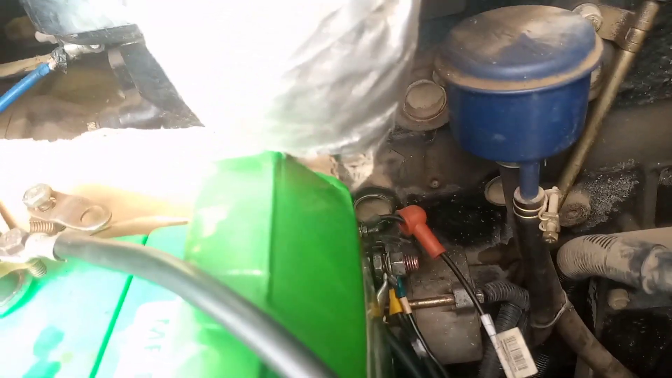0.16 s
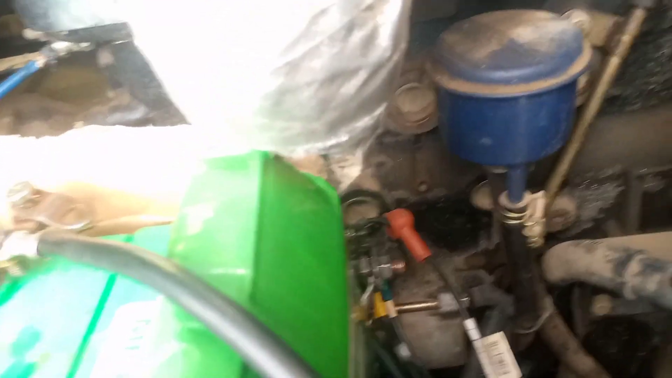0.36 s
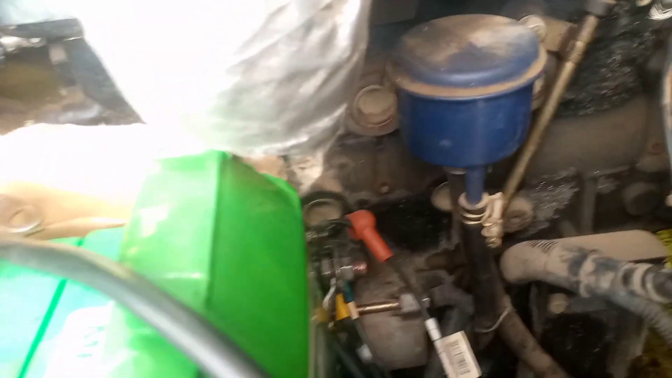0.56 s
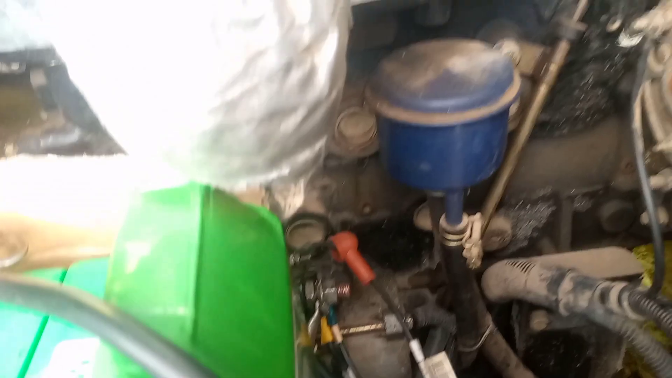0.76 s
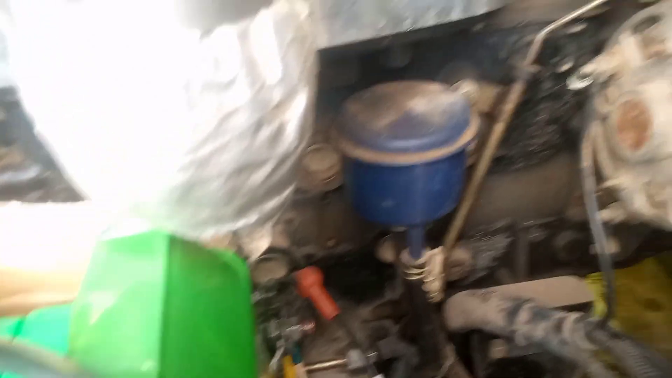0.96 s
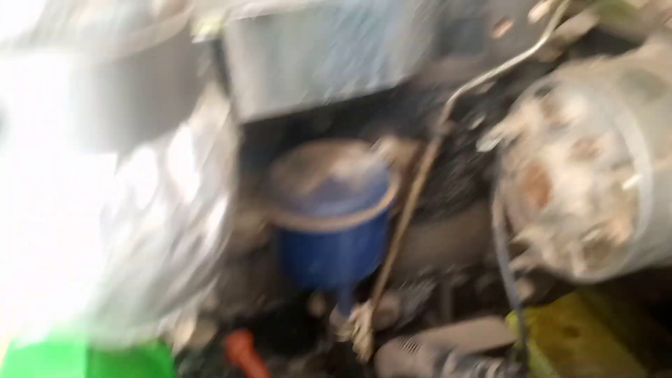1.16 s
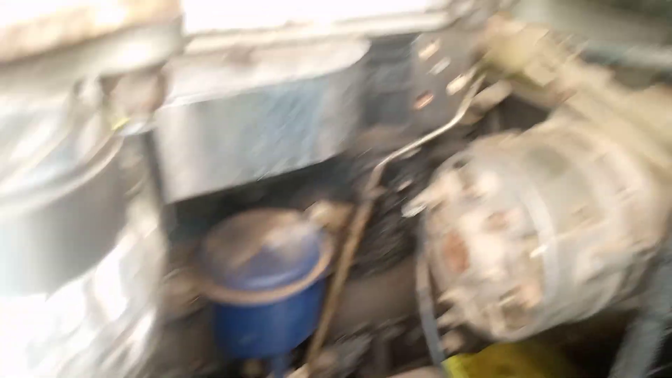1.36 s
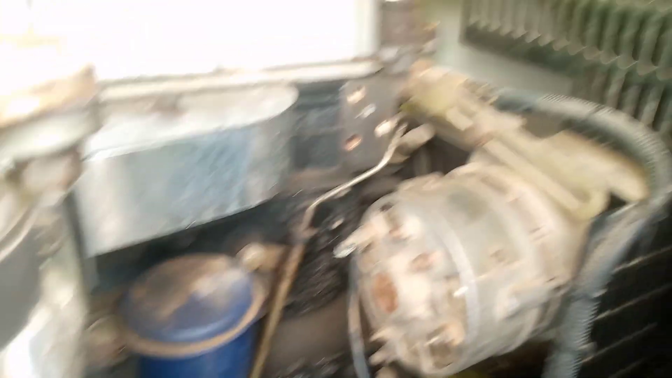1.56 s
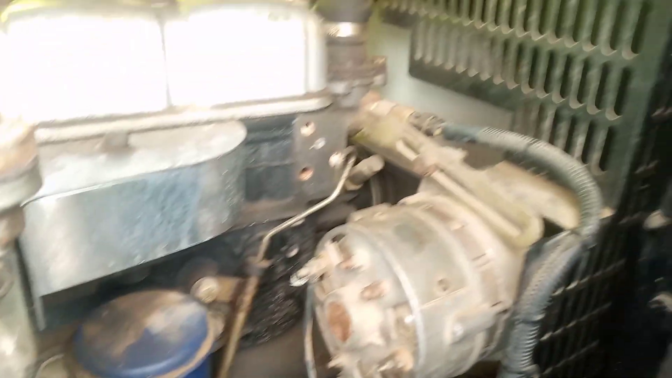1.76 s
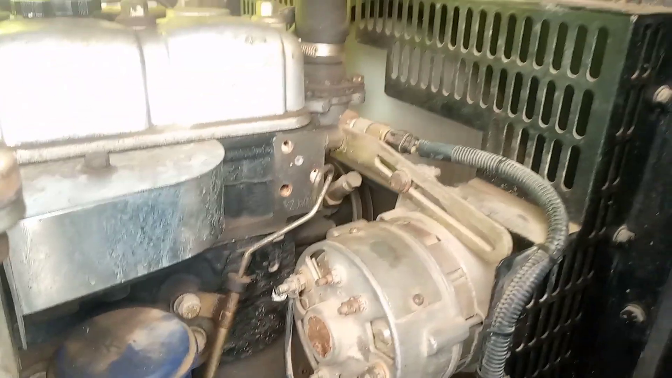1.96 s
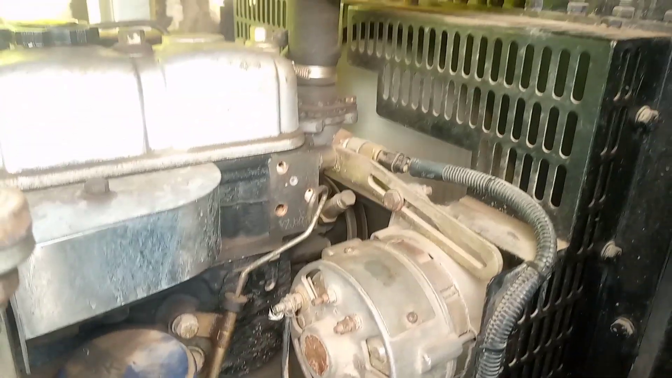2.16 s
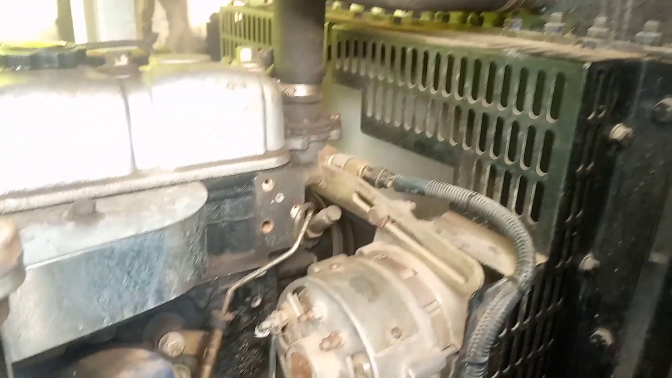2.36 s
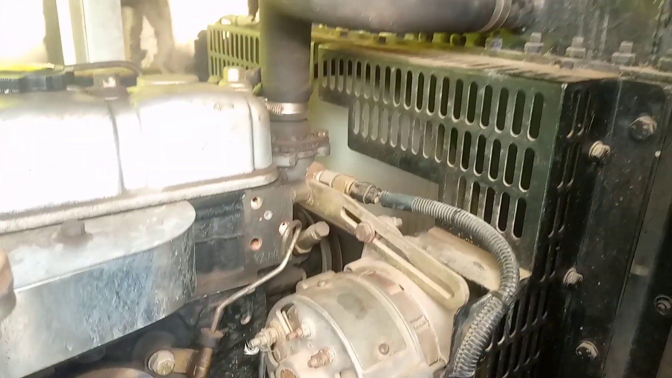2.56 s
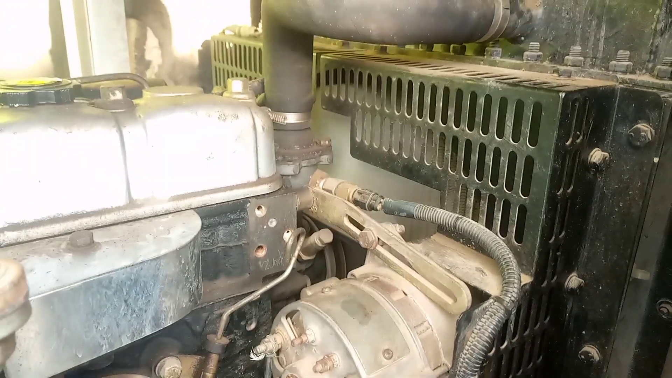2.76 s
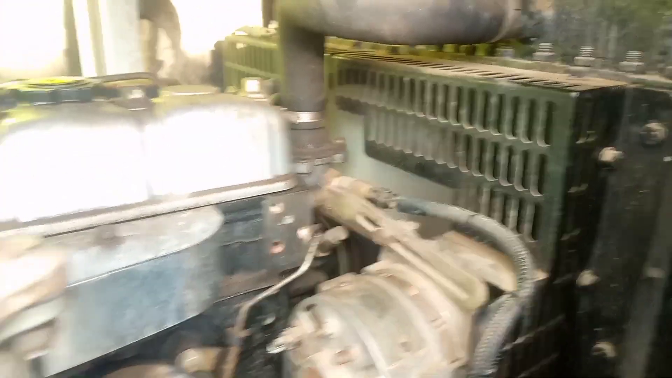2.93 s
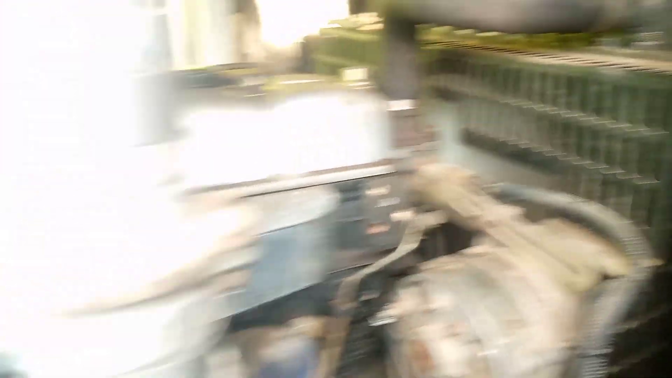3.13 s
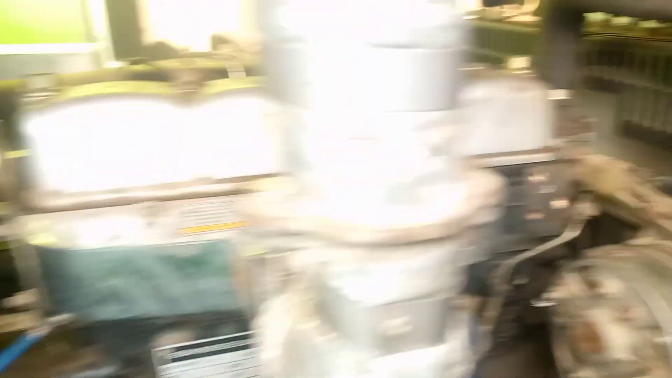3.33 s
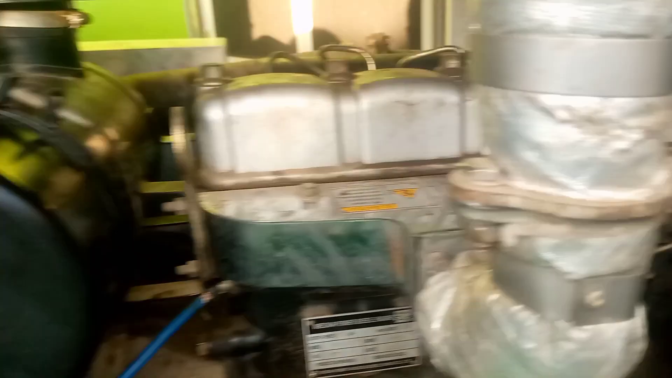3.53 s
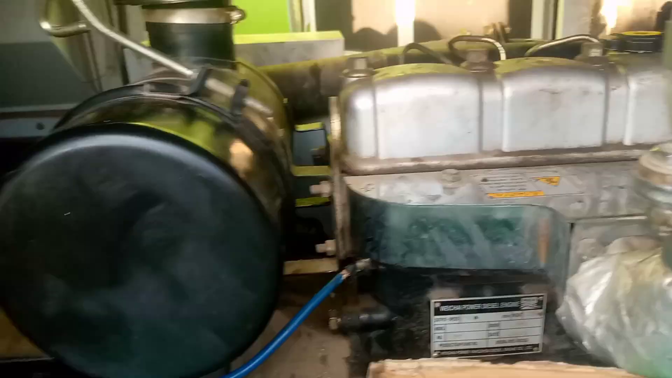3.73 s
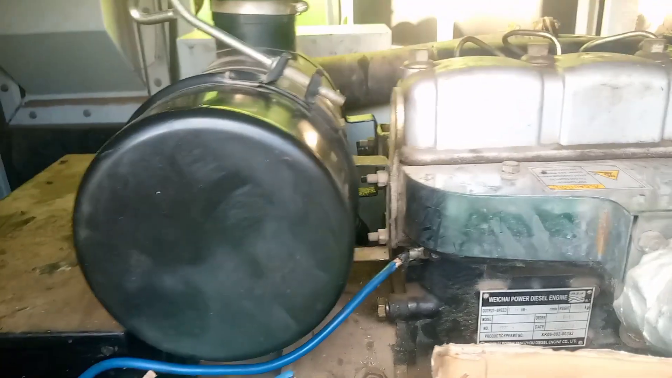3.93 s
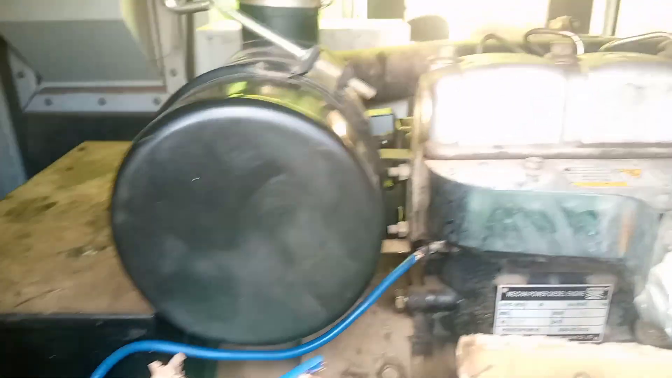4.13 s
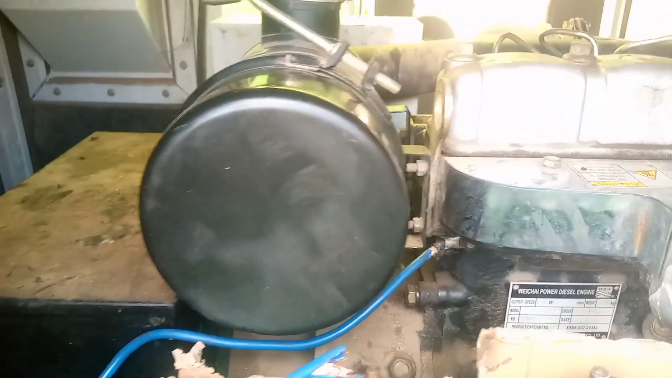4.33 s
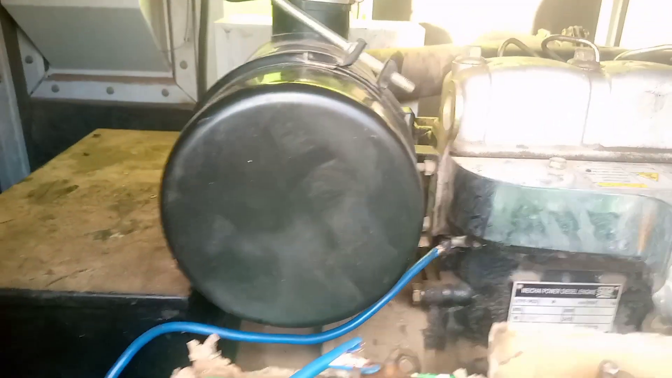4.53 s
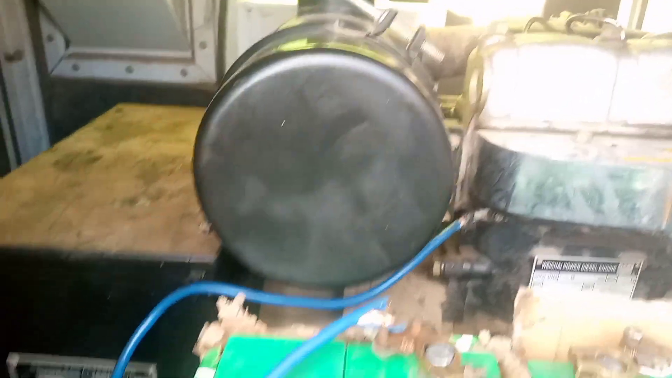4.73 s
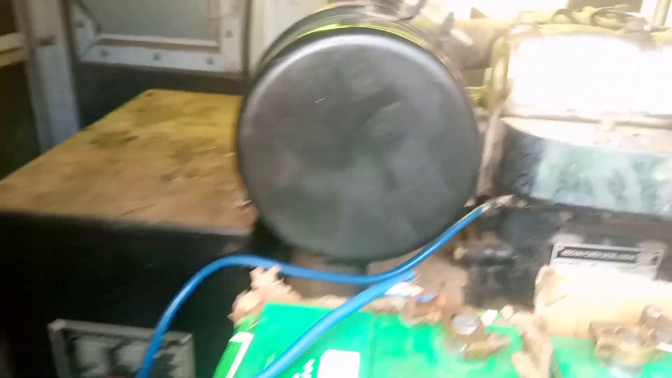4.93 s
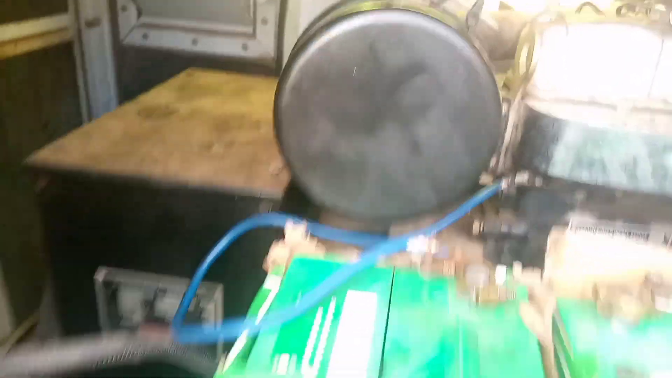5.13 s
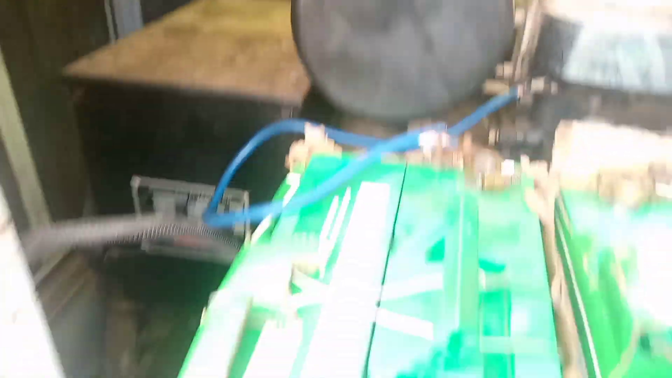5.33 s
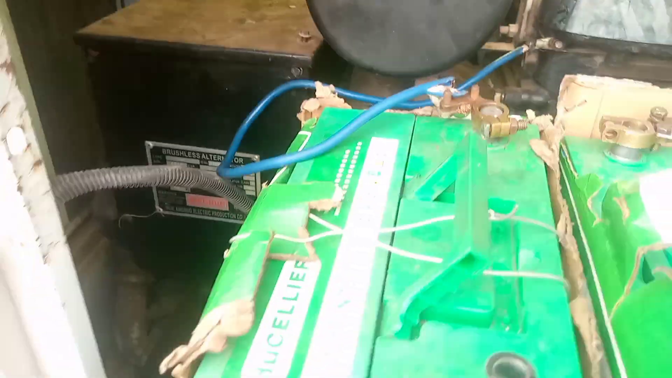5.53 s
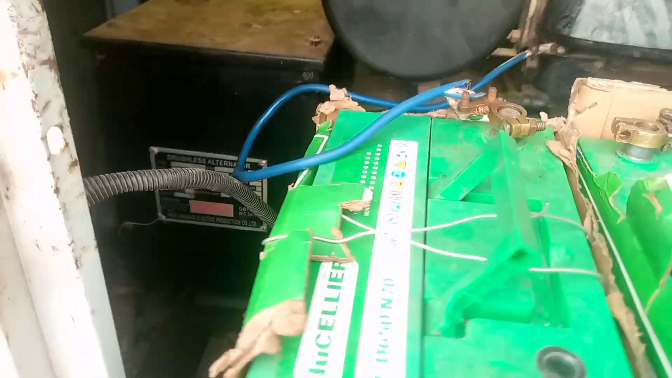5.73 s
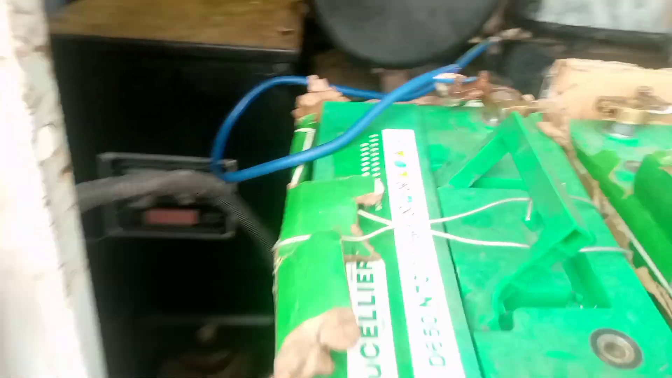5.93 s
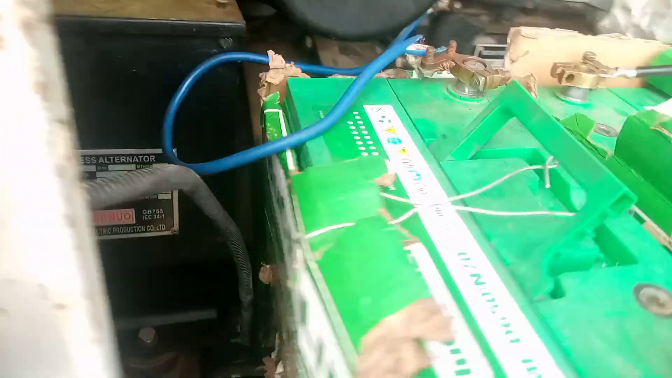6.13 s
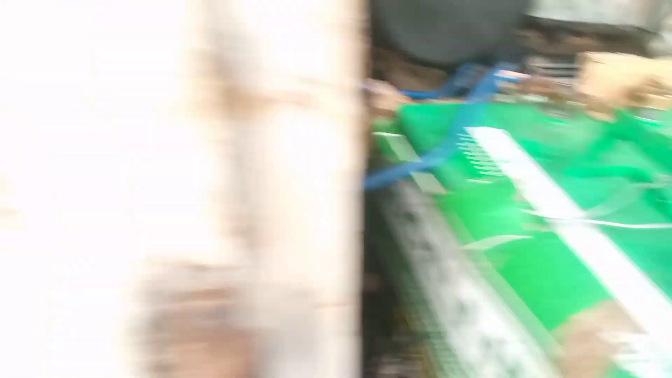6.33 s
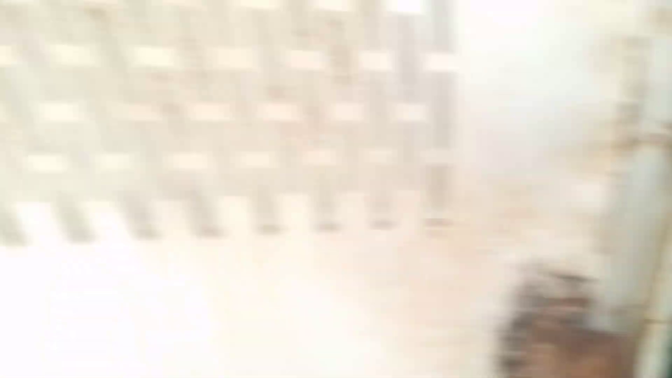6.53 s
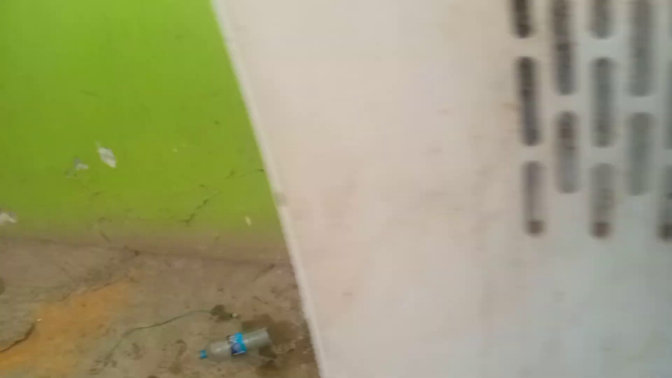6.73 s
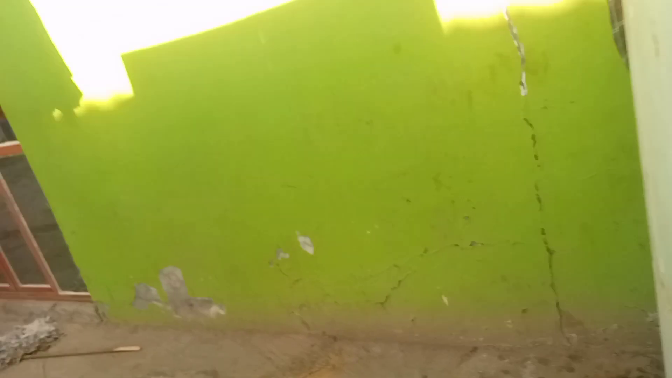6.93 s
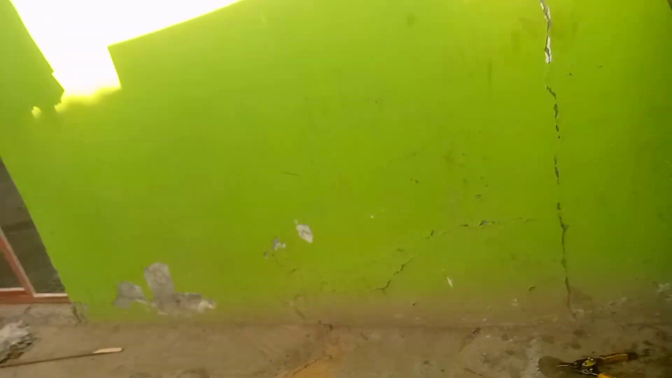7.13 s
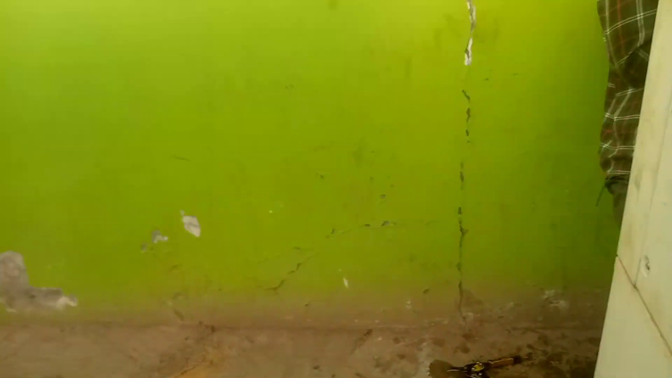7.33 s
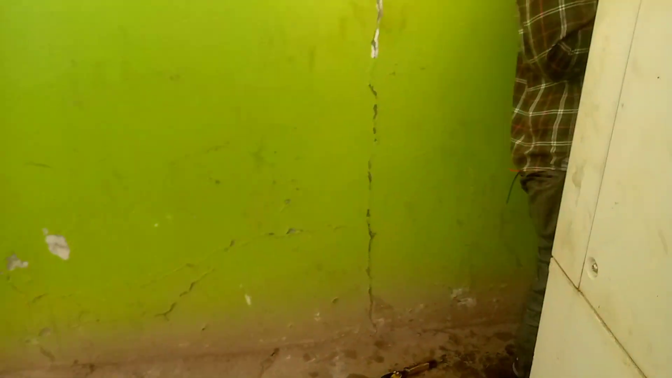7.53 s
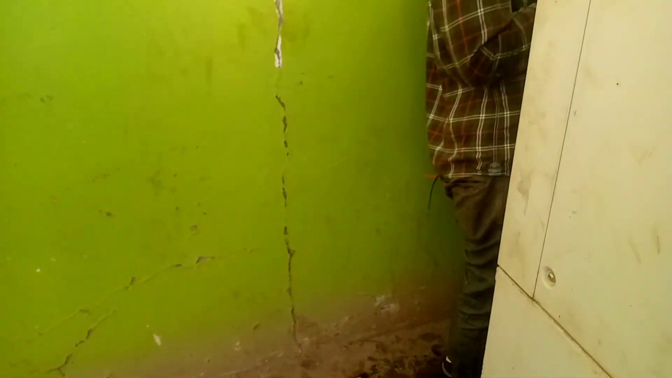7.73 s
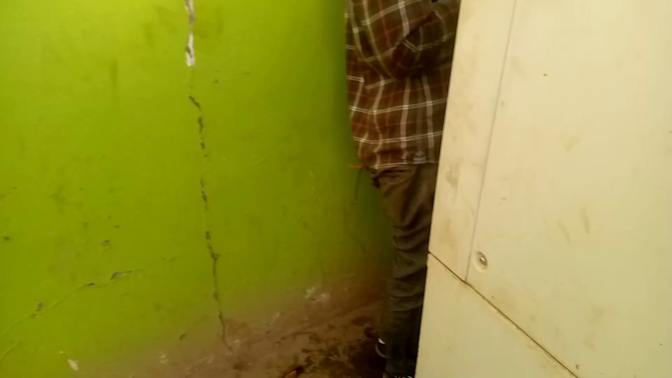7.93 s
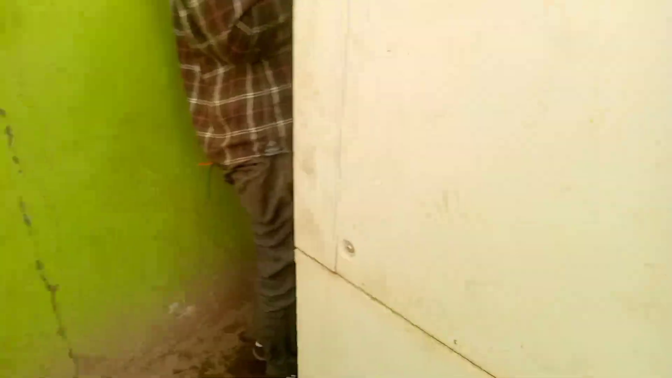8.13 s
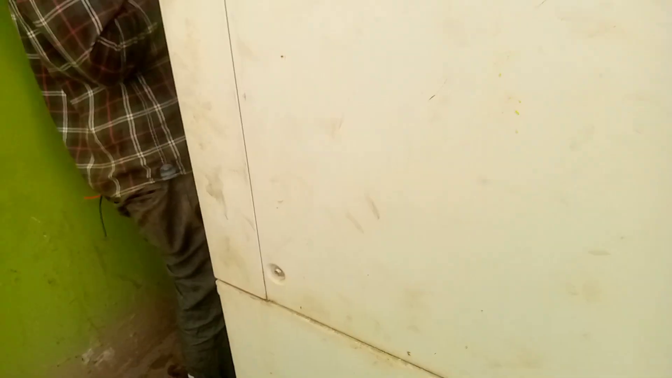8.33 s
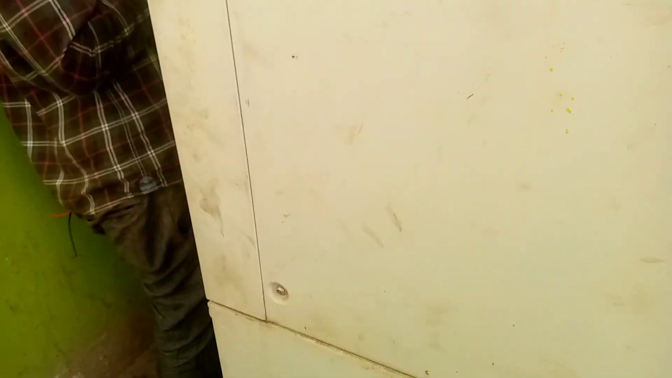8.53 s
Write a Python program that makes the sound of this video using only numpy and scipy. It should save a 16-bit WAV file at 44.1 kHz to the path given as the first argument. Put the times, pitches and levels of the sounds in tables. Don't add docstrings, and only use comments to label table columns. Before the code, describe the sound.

Close beside an open metal canopy, a four-cylinder diesel generator runs at constant speed, its rapid metallic knocking over a deep exhaust hum. A hard click on the camera shell near the start briefly ducks the sound; a softer one follows later. The clatter shifts colour as the camera pans, then fades behind the canopy, leaving mostly hum. Dull hand-held microphone, outdoors by a wall.

```python
import sys
import numpy as np
from scipy import signal
from scipy.fft import rfft, irfft, next_fast_len
from scipy.io import wavfile
from scipy.ndimage import map_coordinates

SR = 44100
rng = np.random.default_rng(int(sys.argv[2]) if len(sys.argv) > 2 else 0)


def master_out(mix):
    frames = np.transpose(np.atleast_2d(mix))
    ceiling = np.clip(frames, -1, 1)
    pcm = np.round(ceiling * 32767).astype(np.int16)
    wavfile.write(sys.argv[1], SR, pcm)


def volts_from_decibels(level):
    exponent = np.asarray(level, float) / 20
    return 10 ** exponent


N = 378378

CYCLE_HZ = 81.8 / 8
DETOUR_S = 0.0046

# (time [s], along the engine [m], height [m], shade of the canopy [0-1])
CAMERA_WALK = [(0.0, 0.52, -0.36, 0.04), (0.8, 0.47, -0.24, 0.07), (1.2, 0.8, 0.33, 0.05),
               (2.2, 0.93, 0.4, 0.07), (3.1, 0.73, 0.78, 0.06), (3.5, 0.11, 0.69, 0.09),
               (3.9, -0.53, 0.57, 0.04), (4.4, -0.49, 0.64, 0.02), (4.75, -0.46, 0.45, 0.0),
               (5.2, -0.63, 0.016, 0.0), (5.6, 0.063, -0.078, 0.17), (6.0, -0.11, 0.053, 0.13),
               (6.4, 0.19, 0.18, 0.27), (6.6, 0.13, -0.039, 0.37), (7.15, -0.21, 0.24, 1.0),
               (7.45, -0.29, -0.22, 1.1), (7.9, 0.35, 0.22, 1.18), (8.58, 0.36, 0.45, 1.07)]
# (time [s], lead [ms])
CLATTER_LEAD = [(0, 3), (1.4, 3.2), (2, 1.7), (3, 2), (4.2, 1.2), (6.2, 1), (7, 1), (7.4, 0), (8.58, 0)]


def unit(x):
    return x / np.sqrt(np.mean(x ** 2) + 1e-20)


def along(points, hz):
    f, v = np.transpose(points)
    return np.interp(np.log(hz + 1), np.log(f + 1), v)


def curves(rows):
    s, *cols = np.transpose(rows)
    return [np.interp(np.arange(N) / SR, s, c) for c in cols]


def wobble(rate):
    coarse = np.arange(0, N + 64, 64)
    knots = rng.standard_normal(int(N * rate / SR) + 4)
    return np.interp(np.arange(N), coarse, map_coordinates(knots, [coarse * rate / SR]))


def filtered(x, response):
    m = next_fast_len(N + SR // 2)
    return irfft(rfft(x, m) * response(np.fft.rfftfreq(m, 1 / SR)), m)[..., :N]


def modes(table):
    def response(f):
        total = 0
        for k, (centre, width, db) in enumerate(table):
            total = total + (-1) ** k * volts_from_decibels(db) * 1j * f * width / (centre ** 2 - f * f + 1j * f * width)
        return total
    return response


def ring(x, table, top=1.54):
    low, high = 0.7 * table[0][0], top * table[-1][0]
    return unit(filtered(x, lambda f: modes(table)(f) * f * f / (f * f + low ** 2) / (1 + 1j * f / high) ** 2))


def heard(*parts):
    # (along [m], height [m], depth behind the camera's path [m],
    # level at 1 m [dB], loss in full shade [dB])
    places = dict(order1=(0, 0.95, 1.5, -32.5, 0.5), order2=(0.55, 0.2, 2.5, -16.5, 7.5),
              order3=(0.5, -0.6, 2.5, -22, 8.5), rumble=(0.56, 0.14, 1.79, -27, 7.5),
              sump=(0.7, -.35, 1.56, -26, 13), block=(0.6, 0.27, 1.84, -25.5, 14),
              head=(0.69, 1.14, 1.01, -25, 16.5), injector=(0.23, -0.02, 0.37, -36.5, 23),
              plate=(.87, 0, 0.4, -33, 15.7), cover=(0.73, 0.5, 0.62, -31.5, 19),
              panels=(-0.54, .04, 0.93, -38, 6.5), pan=(0.84, -0.2, 0.07, -42.5, 4),
              door=(-0.02, .31, 0.14, -43, 10.5), filter=(-.7, 0.6, 0.35, -43.5, 15),
              pump=(-0.3, 0.4, 0.22, -46.5, 17.5), pipes=(.5, -0.1, .12, -50.5, 18.5),
              gears=(0.88, 0.7, 0.3, -39.5, 18.5), wall=(-.48, 0.3, 0.34, -50.5, -1.6))
    x, y, shade = curves(CAMERA_WALK)
    levels = []
    for part in parts:
        px, py, depth, db, loss_db = places[part]
        spreading = 10 * np.log10((x - px) ** 2 + (y - py) ** 2 + depth ** 2 + 1e-3)
        shadow = loss_db * np.abs(shade) ** (17 / max(loss_db, 4))
        levels.append(db - spreading - shadow)
    return levels


def crank():
    # (time [s], lead [ms])
    hunting = [(0.0, -0.33), (0.3, -0.25), (1.0, 0.89), (1.4, 1.71), (1.8, 1.62), (2.2, 0.15), (2.6, 0.22),
               (3.8, 1.3), (4.6, 2.57), (5.0, 2.73), (5.6, 2.45), (6.2, 3.04), (7.0, 3.02), (7.8, 1.63),
               (8.2, 1.67), (8.58, 1.34)]
    return CYCLE_HZ * (np.arange(N) / SR + curves(hunting)[0] / 1000)


def firings(turns):
    facing_per_m, balance_m = 4.2, 0.22
    cycles = int(turns[-1]) + 3
    _, height, shade = curves(CAMERA_WALK)
    detour = DETOUR_S * shade - curves(CLATTER_LEAD)[0] / 1000
    fill_db = 0.47 + 3.5 * shade
    firing = np.arange(-4, 4 * cycles - 4) / 4 + 0.112
    start = np.interp(firing, turns - detour * CYCLE_HZ, np.arange(N))
    start += SR * np.minimum(firing - turns[0], 0) / CYCLE_HZ
    start = np.round(start + SR * 0.00015 * rng.standard_normal(len(firing))).astype(int)
    above = height[np.clip(start, 0, N - 1)].reshape(cycles, 4) - balance_m
    burn = rng.standard_normal((cycles, 4)) + facing_per_m * above * np.array([0, -1, 0, 1])
    return start, burn, fill_db


def blows(fire, part, rise, t60, strike, strike_db, second_db, steady_db, repeat):
    by_cylinder = dict(sump=[1.2, 4.5, -3.5, 0.3], pan=[-14.5, 1.5, -8.5, 0], block=[0, 1, 0, -1],
                   plate=[-1.5, -1.2, 0.66, 1.2], cover=[-3, 0.5, -5.5, 0], head=[1, 0, -1, 1],
                   injector=[2.5, 1.7, 0, 1.5])
    start, burn, fill_db = fire
    t = np.arange(SR // 30) / SR
    repeat = np.clip(repeat, 0, 0.95)
    grit = rng.standard_normal((len(burn) + 9, 4, len(t)))
    grit = signal.lfilter([np.sqrt(1 - repeat ** 2)], [1, -repeat], grit, axis=0)[9:]
    first = volts_from_decibels(-60 * t / t60) * (1 - np.exp(-t / rise)) ** 2
    late = np.maximum(t - 0.011, 0)
    second = volts_from_decibels(second_db - 60 * late / t60) * (1 - np.exp(-late / 0.00019))
    grit *= first + second
    grit[..., round(strike * SR)] += volts_from_decibels(strike_db)
    size = volts_from_decibels(np.array(by_cylinder[part]) + 0.7 * burn + 0.7 * rng.standard_normal(burn.shape))
    index = SR + start[:, None] + np.arange(len(t))
    train = np.bincount(index.ravel(), (size[..., None] * grit).ravel())[SR:SR + N]
    rattle = volts_from_decibels(steady_db + fill_db + 0.7 * wobble(14)) * rng.standard_normal(N)
    return (train + rattle) * volts_from_decibels(-0.4 * fill_db)


def fingers():
    # (time [s], peak [dB], gain dip [dB])
    clicks = [
        (0.867, 0, -13.5),
        (0.8707, -10.5, 4.5),
        (2.9745, -12, 0.5),
    ]
    # (time [s], peak [dB])
    creak_times = [(0.4765, -53), (0.7196, -57.5), (0.7786, -59), (0.8185, -58), (0.8659, -43),
                   (1.7388, -53.5), (2.5782, -50), (2.68, -52.5), (2.7187, -63), (2.9736, -44.5),
                   (3.239, -62), (3.5583, -56), (3.5987, -58), (3.7988, -58), (4.3789, -67), (4.4852, -62),
                   (4.778, -61), (4.998, -60), (5.659, -60), (6.0498, -63), (6.147, -55), (6.3425, -66.5)]
    # (centre [Hz], width [Hz], level [dB])
    shell = [(900, 1500, 0), (2460, 300, 5.5), (4960, 1400, -1), (9000, 3000, -15.5), (14500, 3000, -28)]
    taps, creaks, dip_db = np.zeros(N), np.zeros(N), np.zeros(N)
    t = np.arange(N) / SR
    for s, db, depth_db in clicks:
        taps[round(s * SR)] = volts_from_decibels(db + 10.5)
        recovery = np.exp(-np.maximum(t - s - 0.015, 0) / 0.033)
        onset = 1 + np.exp(-np.clip((t - s + 0.0083) / 0.0035, -50, 50))
        dip_db += depth_db * recovery / onset
    for s, db in creak_times:
        creaks[round((s + 0.001) * SR)] = volts_from_decibels(db + 39.5)
    return filtered(taps, modes(shell)) + filtered(creaks, modes([(11000, 7000, 0.016)])), dip_db


def oil_pan(fire):
    blow = blows(fire, "pan", rise=0.0014, t60=0.03, strike=0.00496, strike_db=24,
                 second_db=-13.5, steady_db=-13.0, repeat=0.63)
    return volts_from_decibels(heard("pan")[0]) * ring(blow, [(652.4, 28, 0)])


def cover(fire):
    # (time [s], frequency [Hz])
    cover_pitch = [(0, 1957), (1, 1969), (2.5, 1992), (3.4, 1960), (4.2, 2005), (4.9, 2004), (5.5, 1914),
                   (6.2, 1974), (8.6, 1980)]
    # (centre [Hz], width [Hz], level [dB])
    plate_modes = [(1599, 34, 1.5), (1652, 78, 3)]
    panel_modes = [(359, 55, -1.4), (409.4, 27, -0.45), (460.4, 46, -0.33)]
    plate_db, cover_db, panels_db = heard("plate", "cover", "panels")
    plate = blows(fire, "plate", rise=0.001, t60=0.041, strike=0.002633, strike_db=21.0,
                  second_db=-8.5, steady_db=-11.0, repeat=0.66)
    drive = blows(fire, "cover", rise=0.0014, t60=0.035, strike=0.003033, strike_db=23.5,
                  second_db=3.0, steady_db=-13.0, repeat=0.72)
    share = np.clip((curves(cover_pitch)[0] - 1950) / 65, 0, 1) * np.pi / 2
    low, high = ring(drive, [(1960, 54, 0)]), ring(drive, [(2005, 28, 0)])
    lid = np.cos(share) * low - np.sin(share) * high
    panels = ring(rng.standard_normal(N) + 0.089 * plate, panel_modes)
    out = volts_from_decibels(plate_db - 0.8) * ring(plate, plate_modes)
    return out + volts_from_decibels(cover_db + 1.36) * lid + volts_from_decibels(panels_db - 1.0) * panels


def fittings(sump, block, head, injector):
    # (centre [Hz], width [Hz], level [dB])
    door = [(697, 150, -6.5), (1510, 80, -7), (1607, 83, 2), (1718, 80, -2)]
    air_filter = [(640, 44, -1), (772, 60, -1.5), (1064, 36, -3), (1231, 60, 2)]
    pump = [(2480, 140, -4.5), (2864, 90, 0.5), (3144, 160, -0.5), (4520, 60, -9)]
    pipes = [(3310, 150, 0.5), (3654, 150, -1.5), (3780, 120, -0.5), (4284, 120, -3)]
    gears = [(1338, 78, 0), (1483, 90, 0)]
    wall = [(443, 83, -0.5), (558, 90, 1), (684, 110, 1.5)]
    door_db, filter_db, pump_db, pipes_db = heard("door", "filter", "pump", "pipes")
    gears_db, wall_db = heard("gears", "wall")
    out = volts_from_decibels(pipes_db) * ring(injector, pipes) + volts_from_decibels(gears_db) * ring(block, gears)
    out += volts_from_decibels(wall_db) * ring(head, wall) + volts_from_decibels(door_db) * ring(block, door)
    return out - volts_from_decibels(filter_db) * ring(sump, air_filter) - volts_from_decibels(pump_db) * ring(injector, pump)


def knock(fire):
    # (centre [Hz], width [Hz], level [dB])
    sump_modes = [(538.5, 95, -3.5), (673, 72, -3.5), (797, 118, -3.5), (973, 270, -5.5)]
    block_modes = [(1071, 170, -6), (1258, 110, -0.5), (1415, 136, 0), (1527, 104, 1), (1915, 660, -8)]
    head_modes = [(2179, 42, 1.5), (2342, 207, -3), (2598, 126, 0), (2778, 227, -3), (2950, 91, 0.5),
                  (3080, 97, -0.5), (3222, 274, -3.5), (3650, 374, -8)]
    injector_modes = [(3690, 130, -6.5), (4088, 51, 1.5), (4384, 120, -3.5), (4690, 170, -4.5),
                      (5042, 120, -3.5), (5485, 160, -6), (5860, 200, -5.5), (6550, 580, -9.5),
                      (9000, 3800, -22), (15400, 1300, -23)]
    sump_db, block_db, head_db, injector_db = heard("sump", "block", "head", "injector")
    sump = blows(fire, "sump", rise=0.0023, t60=0.055, strike=0.00553, strike_db=17.0,
                 second_db=-7.5, steady_db=-7.5, repeat=0.75)
    block = blows(fire, "block", rise=0.0015, t60=0.049, strike=0.00285, strike_db=17.5,
                  second_db=-19.0, steady_db=-14, repeat=0.79)
    head = blows(fire, "head", rise=0.0017, t60=0.053, strike=0.003, strike_db=0.5,
                 second_db=-27.0, steady_db=-16.0, repeat=0.83)
    injector = blows(fire, "injector", rise=0.0022, t60=0.044, strike=0.0048, strike_db=2.5,
                     second_db=-31.0, steady_db=-19, repeat=0.53)
    out = volts_from_decibels(sump_db - 2.0) * ring(sump, sump_modes) + volts_from_decibels(block_db + 2.0) * ring(block, block_modes)
    out += volts_from_decibels(head_db - 1.65) * ring(head, head_modes)
    out += volts_from_decibels(injector_db - 1.5) * ring(injector, injector_modes, top=2.0)
    return out + fittings(sump, block, head, injector)


def exhaust(turns):
    # (multiple of the cycle rate, level re rumble [dB], gain in
    # shade [dB], phase in the open [rad], phase in shade [rad])
    higher_orders = [(16.01, -6, -1, 2.5, 2.5), (19.89, -14, 5, -1, -1.6), (24.02, -13, 7, 1, -1.5)]
    # (multiple of the cycle rate, level re rumble [dB])
    uneven = [(6, -11.5), (7, -24), (9, -14), (10, -19), (11, -18.5), (13, -22.5), (15, -15.5), (17, -15.5),
              (18, -12.5), (23, -21.5), (25, -9.5), (27, -16.5), (28, -16)]
    # (frequency [Hz], level [dB])
    rumble_shape = [(20, -33.5), (35, -28), (60, -9), (100, 1), (170, -3.5), (260, -5.5), (320, -5.5),
                    (400, -45), (600, -66)]
    db1, db2, db3, rumble_db = heard("order1", "order2", "order3", "rumble")
    angle, shade = 2 * np.pi * turns, curves(CAMERA_WALK)[2]
    bend = DETOUR_S * shade * 2 * np.pi * 50
    open_phase = (0.41 * curves(CLATTER_LEAD)[0] - 0.75) * (1 - shade)
    tone = volts_from_decibels(db1 + 0.7 * wobble(7.6)) * -np.sin(4 * angle - bend / 2)
    tone += volts_from_decibels(db2 + 0.82 * wobble(8)) * np.cos(8 * angle)
    tone += volts_from_decibels(db3 + 1.2 * wobble(10)) * np.cos(12 * angle - bend + open_phase)
    for k, db, shade_db, open_rad, shade_rad in higher_orders:
        phase = open_rad + (shade_rad - open_rad) * shade + 0.3 * wobble(1.3)
        tone += volts_from_decibels(rumble_db + db + shade_db * shade + 1.0 * wobble(8.2)) * np.cos(k * angle + phase)
    for k, db in uneven:
        phase = 0.58 * wobble(3) + rng.uniform(0, 2 * np.pi)
        tone += volts_from_decibels(rumble_db + db + 1.3 * wobble(4.4)) * np.cos(k * angle + phase)
    rumble = unit(filtered(rng.standard_normal(N), lambda hz: volts_from_decibels(along(rumble_shape, hz))))
    return np.sqrt(2) * tone + volts_from_decibels(rumble_db - 3.5 + 1.5 * wobble(7.3)) * rumble


def scene():
    turns = crank()
    fire = firings(turns)
    clicks, dip_db = fingers()
    engine = oil_pan(fire) + cover(fire) + knock(fire) + exhaust(turns)
    return (volts_from_decibels(dip_db) * engine + clicks)[None]


def band_limit(x):
    return signal.sosfilt(signal.butter(12, 15830, fs=SR, output="sos"), x)


def record(dry):
    # (frequency [Hz], level [dB])
    microphone = [(20, -0.5), (5000, 1.5), (6500, -8.5), (8000, -18), (10000, -26), (13500, -27),
                  (15000, -21.5), (15800, -19), (22050, -17)]
    mic = filtered(dry, lambda hz: volts_from_decibels(along(microphone, hz)))
    mic = mic + volts_from_decibels(-104) * rng.standard_normal(dry.shape)
    return band_limit(mic)


dry = scene()
out = record(dry)
master_out(out)
```